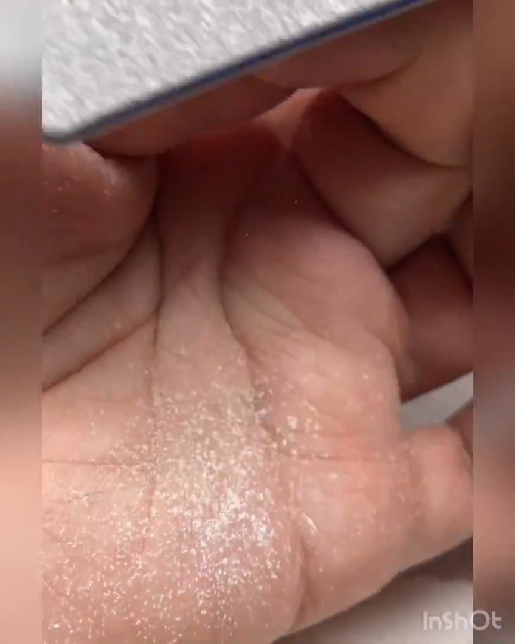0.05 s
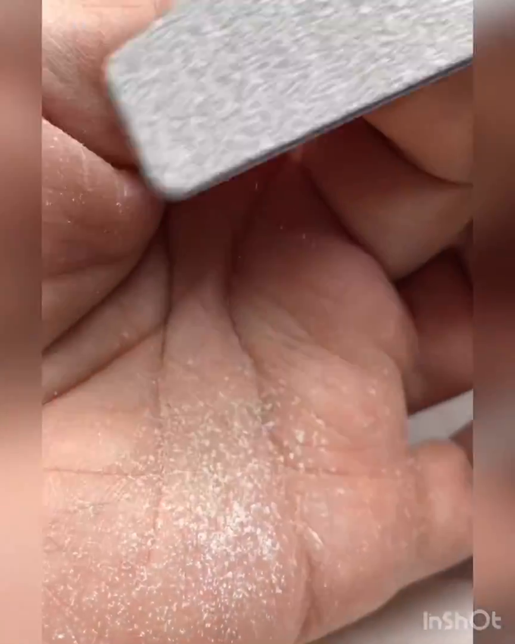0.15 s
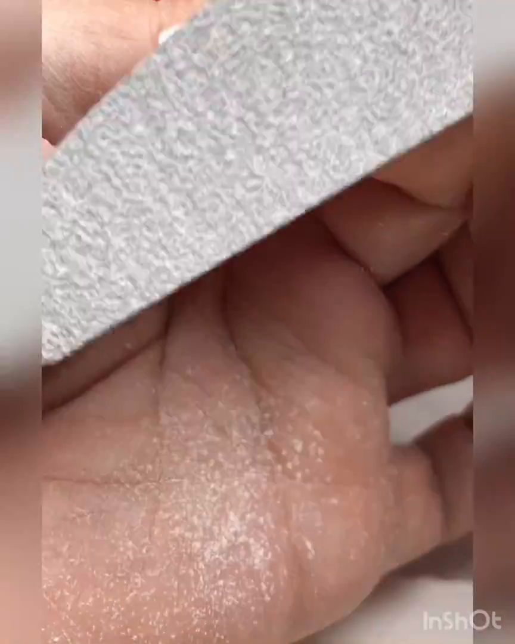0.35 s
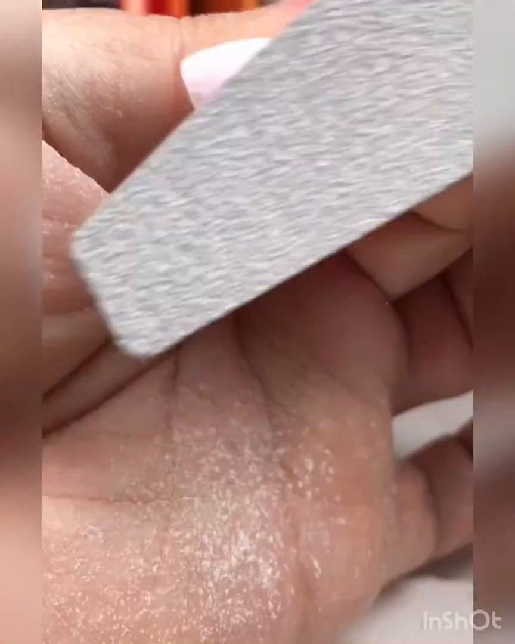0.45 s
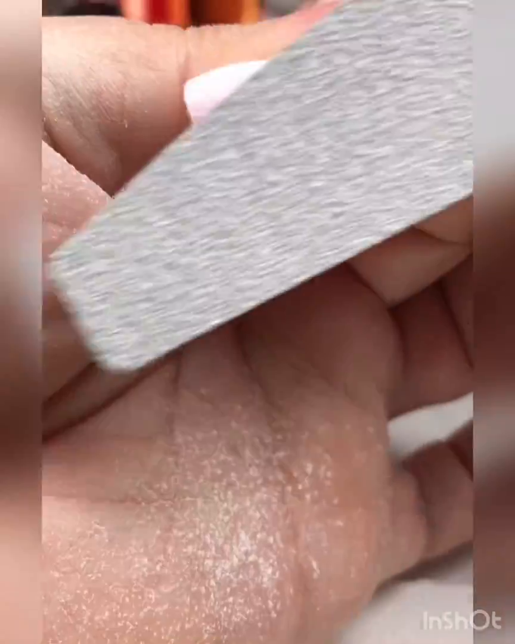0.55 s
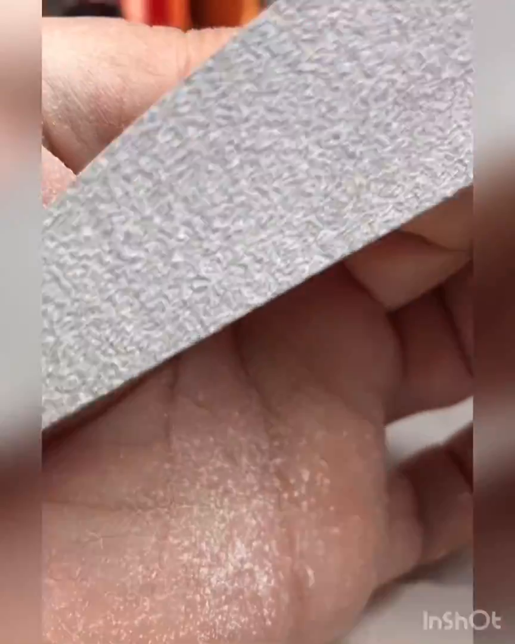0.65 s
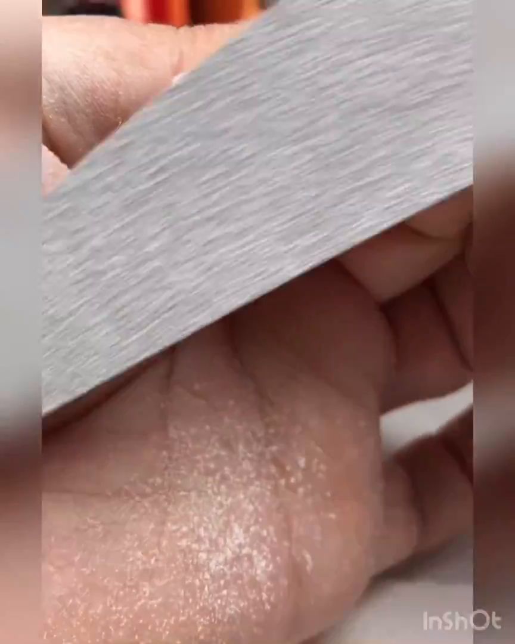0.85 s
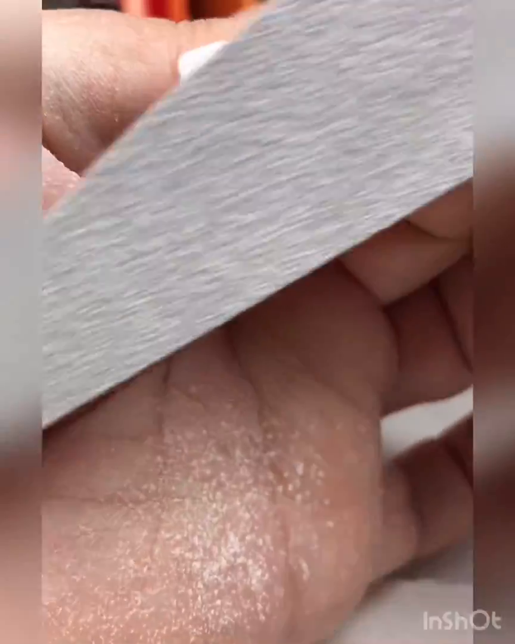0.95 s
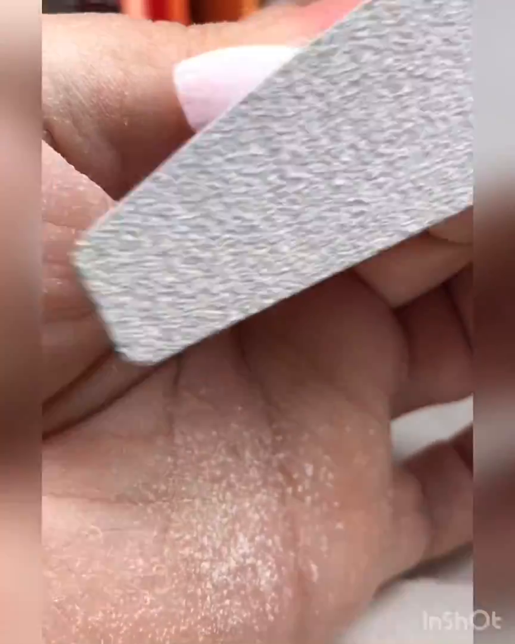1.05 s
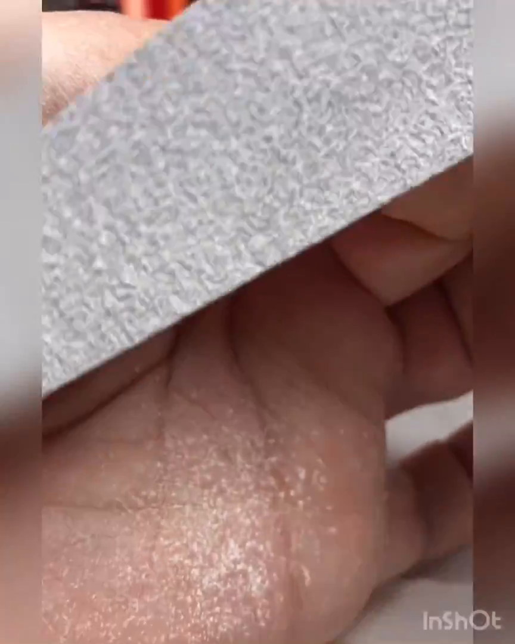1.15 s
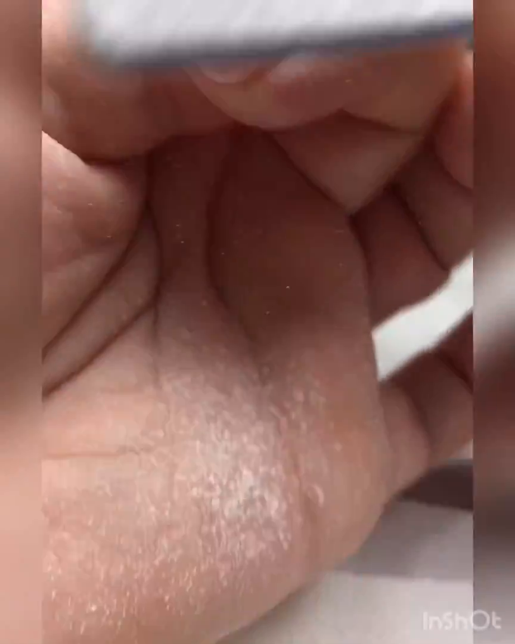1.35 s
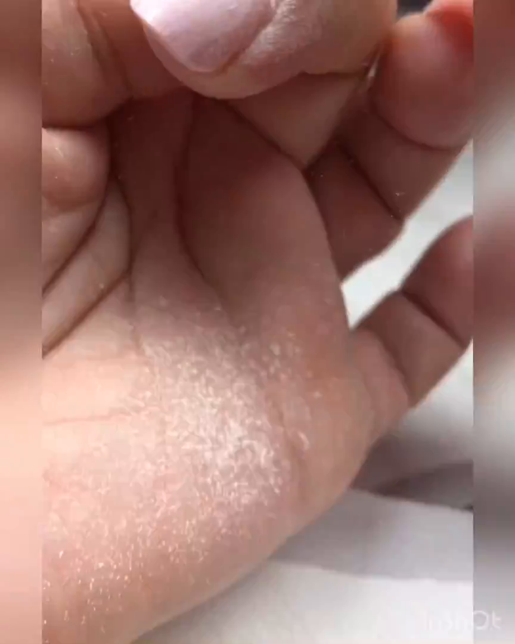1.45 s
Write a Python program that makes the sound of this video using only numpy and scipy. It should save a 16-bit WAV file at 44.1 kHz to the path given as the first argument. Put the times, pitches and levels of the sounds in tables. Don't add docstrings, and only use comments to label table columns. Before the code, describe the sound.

A nail file rasps on a fingernail, close to a phone in a quiet room. A soft, longer stroke at 0.02 s, a firmer one at 0.21, then short alternating strokes about every 0.13 s from 0.37, louder and brighter until the hardest at 1.14. Tiny clicks snag, sharpest near 0.95 and 1.17. A faint drag fades from 1.25 to 1.35 over hush, faint hum and soft handling bumps.

```python
import sys
import numpy as np
from scipy import signal
from scipy.fft import rfft, irfft
from scipy.io import wavfile
from scipy.ndimage import uniform_filter1d

SR = 44100
rng = np.random.default_rng(int(sys.argv[2]) if len(sys.argv) > 2 else 0)


def master_out(mix):
    frames = np.transpose(np.atleast_2d(mix))
    ceiling = np.clip(frames, -1, 1)
    pcm = np.round(ceiling * 32767).astype(np.int16)
    wavfile.write(sys.argv[1], SR, pcm)


def invert_db(x):
    u = np.asarray(x, float) / 20
    return 10 ** u


N = 66150

# centre in Hz, width in Hz, push level in dB, pull level in dB.
BODY_MODES = [(274, 69, -2.5, -12), (1050, 313, -6.5, 1.5), (2010, 300, -1.5, -11), (2855, 424, 3.5, 1.5),
              (4115, 450, -2, 0.5), (4870, 420, 7, 7), (6250, 790, -5, -3), (7186, 350, -1, -5),
              (8380, 1500, -8, -6), (10400, 1280, -11, -7.5), (11810, 900, 4.5, -0.5),
              (13100, 1060, -9, -5), (14850, 3000, -4, -0.5), (14600, 1500, -7, -9.5)]


def evened(x):
    return x / np.sqrt(np.mean(x ** 2) + 1e-20)


def read(points, hz):
    f, value = np.transpose(points)
    return np.interp(np.log(hz + 1), np.log(f + 1), value)


def add(mix, start_s, sound):
    part = mix[round(start_s * SR):][:len(sound)]
    part += sound[:len(part)]


def grit(size):
    grains_per_s, spread_db, clump_db = 17000, 2.1, 1.6
    strikes = rng.random(size) < grains_per_s / SR
    excess = np.minimum(rng.exponential(1, size), 4)
    sign_and_size = rng.uniform(-1.06, 1, size)
    judder = uniform_filter1d(rng.standard_normal(size), size=70)
    clumps = evened(uniform_filter1d(judder, size=70))
    return evened(strikes * sign_and_size * invert_db(spread_db * excess + clump_db * clumps))


def earlier_stroke():
    t = np.arange(N) / SR
    return grit(N) * invert_db(-59.5 - 690 * t)


def hush(filing):
    # frequency in Hz, density in dB.
    hush_curve = [(32, -48), (50, -5), (250, -0.5), (500, -9.5), (1500, -19), (4000, -23), (9000, -29.5),
                  (15800, -30)]
    hush_db, handling_hz, handling_db = -64.5, 173, -67.5
    z = rfft(rng.standard_normal((2, N)))
    hz = np.fft.rfftfreq(N, 1 / SR)
    still = invert_db(hush_db) * evened(irfft(z[0] * invert_db(read(hush_curve, hz)), N))
    rise = (hz / 65) ** 6
    low = irfft(z[1] * rise / (1 + rise) / (1 + (hz / handling_hz) ** 2), N)
    effort = uniform_filter1d(abs(filing), size=2500) ** 0.15
    return still + invert_db(handling_db) * evened(low * effort)


def hum():
    return invert_db(-71.5) * np.sqrt(2) * np.sin(2 * np.pi * 55.7 * np.arange(N) / SR)


def ringing(modes, bite_db, plain_db=0.):
    # frequency in Hz, level in dB.
    plain_click = [(100, -9.5), (600, -4), (1550, -7.5), (3500, -5), (5600, -5.5), (10000, -5.5),
                   (16000, -12)]
    bite_hz = 10800
    hz = np.fft.rfftfreq(2048, 1 / SR)
    power = invert_db(read(plain_click, hz) + plain_db) ** 2
    for f, width, db in modes:
        power = power + invert_db(db) ** 2 / (1 + (2 * (hz - f) / width) ** 4)
    shelf = hz ** 4 / (hz ** 4 + bite_hz ** 4)
    tilt = np.log2(1 + hz / 400) / 6
    cepstrum = irfft(np.log(np.sqrt(power) * invert_db(bite_db * (shelf + tilt))))
    causal = np.r_[cepstrum[0], 2 * cepstrum[1:1024], np.zeros(1024)]
    h = irfft(np.exp(rfft(causal)))[:1024]
    return h / np.linalg.norm(h)


def held_modes(k):
    # gain in dB of board, nail, nail edge, grit tips.
    angles = [(-3.5, -4, -4.5, 2), (-1.5, -0.9, 5, 4), (0, 0.1, -2.2, -0.5), (4.5, 0.5, -1.5, -5),
              (1.2, 1.8, -4, -1.5), (-0.6, 0.5, 1.5, 1.5), (1.1, 0.1, 0.5, -0.4), (-4, 0.8, 1.5, 1.5),
              (0.5, -1.5, -1.5, 1.5)]
    parts_hz = [2900, 4880, 11850, 14800]
    drift, grip_db = 0.008, 0.8
    modes = []
    for mode in BODY_MODES:
        f, width, held_db = mode[0], mode[1], mode[2 + k % 2]
        near_part = abs(np.log(f / np.array(parts_hz))) < 1 / 14
        held_db = held_db + grip_db * rng.standard_normal() + np.dot(angles[k], near_part)
        modes.append((f * (1 + drift * rng.standard_normal()), width, held_db))
    return modes


def stroke(k, start_s, length_s, pressure_db, bite_db, fastest):
    catch_s, let_go_s = 0.0045, 0.013
    arriving_db, leaving_db, slow_bite_db = -9.5, -12, -6
    t = np.arange(0, length_s, 1 / SR)
    peak = np.clip(fastest, .1, .9)
    slow = np.interp(t / length_s, [0, peak, 1], [1, 0, 1]) ** 2.11
    touch = np.clip(np.minimum(t / catch_s, (length_s - t) / let_go_s), 0, 1)
    slow_db = np.where(t < peak * length_s, arriving_db, leaving_db)
    drive = grit(8000)[:len(t)] * touch * invert_db(pressure_db + slow_db * slow)
    modes = held_modes(k)
    fast = signal.oaconvolve(drive * (1 - slow), ringing(modes, bite_db))
    slowed = signal.oaconvolve(drive * slow, ringing(modes, bite_db + slow_bite_db))
    far = signal.oaconvolve(drive, ringing(modes, bite_db - 7, plain_db=6.0))
    return start_s, np.transpose([fast + slowed, far])


def snag(start_s, peak_db, bite_db):
    t = np.arange(200) / SR
    burst = rng.standard_normal(200) * np.exp(-t / 0.001)
    burst = signal.lfilter(*signal.butter(2, 1800, "high", fs=SR), burst)
    sound = signal.oaconvolve(burst, ringing([m[:3] for m in BODY_MODES], bite_db))
    return start_s, invert_db(peak_db) * sound[:, None] / abs(sound).max()


def sticking():
    # centre in seconds, length in seconds, gain in dB.
    stalls = [
        (0.0383, 0.0038, -14),
        (0.045, 0.0029, 0),
        (0.143, 0.0085, -7.5),
        (.157, 0.0045, -4),
        (0.23, .007, -2.5),
        (0.383, 0.0056, -5),
        (0.641, 0.0098, -5),
        (0.903, 0.0071, 1.5),
        (1.095, 0.0036, 6),
        (1.166, 0.0039, 0),
    ]
    t = np.arange(N) / SR
    gain_db = sum(db * np.exp(-(2 * (t - s) / length_s) ** 2) for s, length_s, db in stalls)
    return invert_db(gain_db)[:, None]


def jolt(start_s, length_s, hz, level_db):
    wobble = uniform_filter1d(rng.standard_normal(4000), size=300)
    t = np.arange(0, min(length_s, .09), 1 / SR)
    turns = np.cumsum(hz * (1 + 5.17 * wobble[:len(t)])) / SR
    return start_s, invert_db(level_db) * 2 * np.sin(np.pi * t / t[-1]) * np.sin(2 * np.pi * turns)


def room(x):
    # frequency in Hz, t60 in seconds.
    decay_curve = [(300, 0.7), (2000, 0.55), (6000, .3), (15000, 0.19)]
    taps = np.zeros(SR // 2)
    at = np.arange(200, len(taps) - 20, 20)
    taps[at + rng.integers(0, 20, len(at))] = rng.choice([-1., 1.], len(at))
    hz, t, z = signal.stft(taps, SR, nperseg=256)
    decay = invert_db(-60 * t / read(decay_curve, hz)[:, None])
    tail = signal.istft(z * decay, SR, nperseg=256)[1]
    return signal.fftconvolve(x, tail / np.linalg.norm(tail))[:N]


def drag():
    # time in seconds, level in dB.
    drag_path = [
        (1.252, -72),
        (1.256, -47.5),
        (1.267, -53.5),
        (1.275, -53.5),
        (1.3, -57.5),
        (1.333, -66.5),
        (1.349, -71),
        (1.45, -99),
    ]
    # centre in Hz, width in Hz, level in dB.
    drag_modes = [(1170, 1200, -1), (2210, 210, 1.5), (3160, 700, 4), (4000, 860, 4), (7650, 1500, -7.5),
                  (8150, 600, -21), (11300, 900, -15), (14440, 1500, -18)]
    drag_db = np.interp(np.arange(N) / SR, *np.transpose(drag_path), left=-140, right=-140)
    return signal.oaconvolve(grit(N) * invert_db(drag_db), ringing(drag_modes, 0., plain_db=-6.5))[:N]


def scene():
    # start in seconds, length in seconds, pressure in dB, treble bite in dB,
    # fastest point as a share of the length [0-1].
    strokes = [
        (.018, 0.15, -45.5, -3, .5),
        (.211, .105, -41, -3, 0.4),
        (.367, 0.085, -42, -2, 0.5),
        (.5, 0.1, -38.5, 2.5, 0.62),
        (.635, 0.098, -37, 1, 0.42),
        (.767, .085, -35.5, 3, 0.43),
        (.896, 0.094, -33, 5.5, 0.53),
        (1.024, 0.089, -33, 5.5, 0.63),
        (1.143, 0.089, -30, 8, 0.57),
    ]
    # start in seconds, peak in dB, treble bite in dB.
    snags = [(.0365, -41, 0), (.0418, -30, 2), (.0482, -35, 2), (.0905, -30, 4), (.104, -33, 4),
             (.1202, -31, 2), (.196, -58, -8), (.238, -31, 2), (.2475, -32, 2), (.2565, -29, -2),
             (.387, -36, 0), (.438, -35, 4), (.6362, -40, 0), (.8968, -36, 0), (.9135, -31, 8),
             (.9425, -25, 18), (.9458, -19, 20), (.9468, -21, 20), (.9482, -18, 14), (.9505, -22, 14),
             (1.1735, -21, 20), (1.189, -29, 14), (1.1925, -30, 14), (1.2013, -28, 14), (1.2575, -42, 8)]
    # start in seconds, length in seconds, pitch in Hz, level in dB.
    jolts = [
        (.04, 0.063, 162, -58.5),
        (.26, 0.023, 134, -61.5),
        (0.673, 0.063, 278, -57.5),
        (.77, 0.03, 75, -59),
        (0.824, 0.073, 109.5, -59.5),
        (.94, 0.047, 115, -61.5),
        (0.949, .05, 301, -60.5),
        (1.151, 0.087, 255, -58.5),
        (1.29, 0.032, 151, -63),
    ]
    filing = drag()[:, None] * [1, 1]
    for k, row in enumerate(strokes):
        add(filing, *stroke(k, *row))
    filing = filing * sticking()
    for row in snags:
        add(filing, *snag(*row))
    low = hum()
    for row in jolts:
        add(low, *jolt(*row))
    near, far = filing.T
    return (near + invert_db(-23) * room(far) + earlier_stroke() + hush(near) + low)[None]


def roll_off(x):
    return signal.sosfilt(signal.butter(12, 16810, fs=SR, output="sos"), x)


def record(dry):
    band_limit = signal.firwin(767, 15830, window=("kaiser", 8), fs=SR)
    return roll_off(signal.oaconvolve(dry, band_limit[None], "same"))


dry = scene()
out = record(dry)
master_out(out)
```